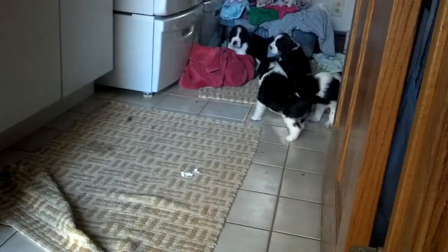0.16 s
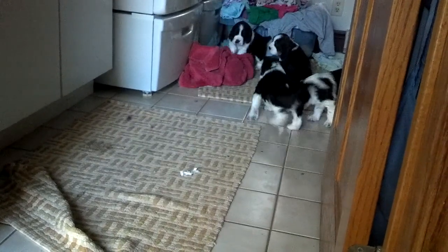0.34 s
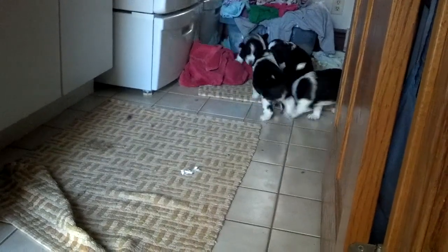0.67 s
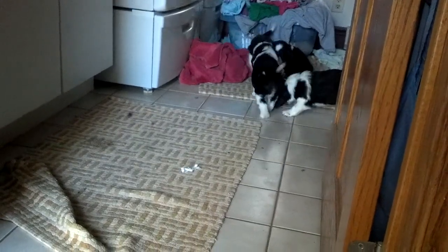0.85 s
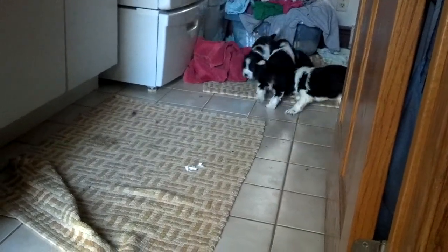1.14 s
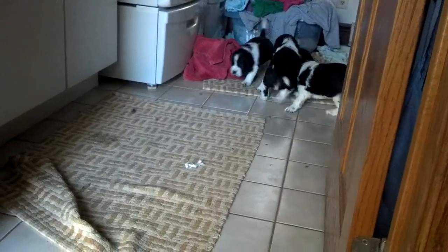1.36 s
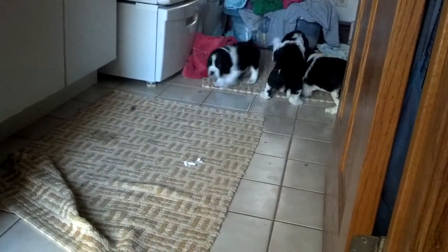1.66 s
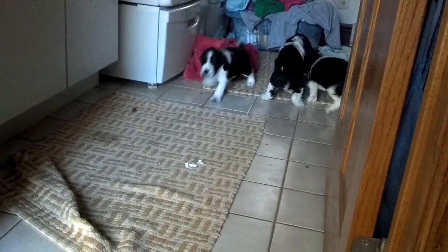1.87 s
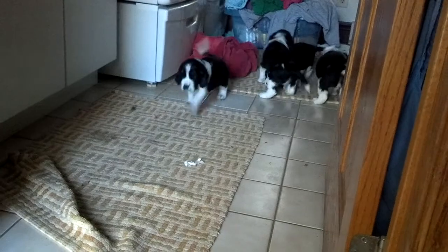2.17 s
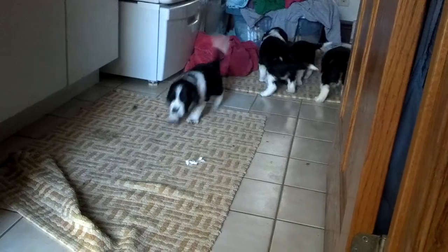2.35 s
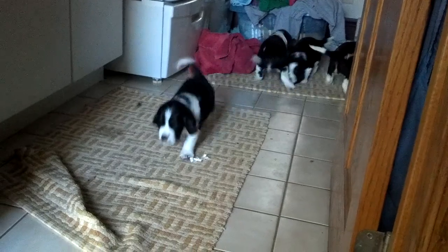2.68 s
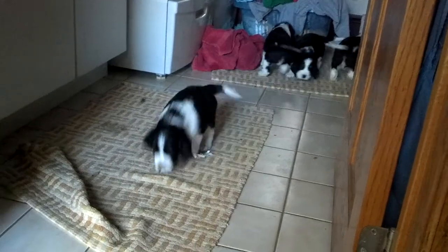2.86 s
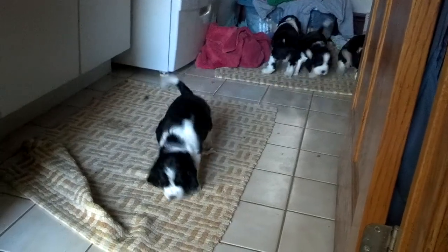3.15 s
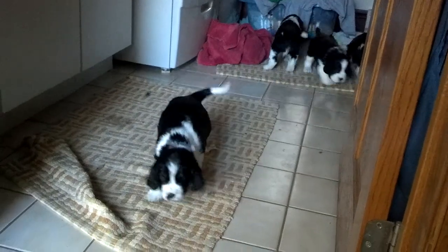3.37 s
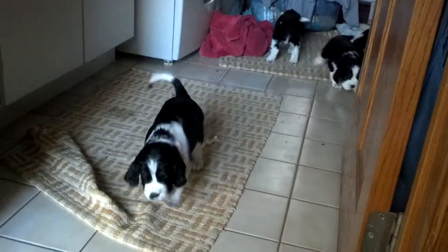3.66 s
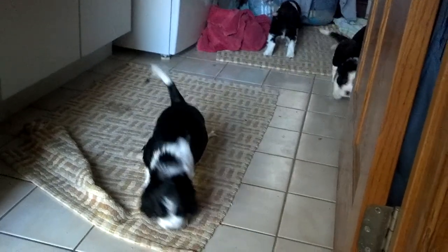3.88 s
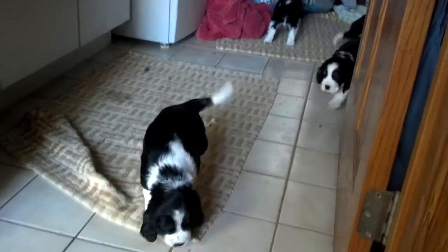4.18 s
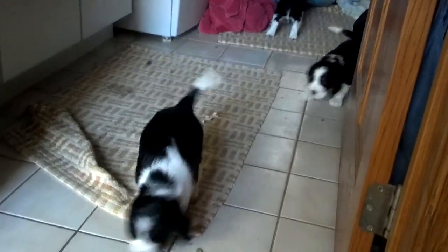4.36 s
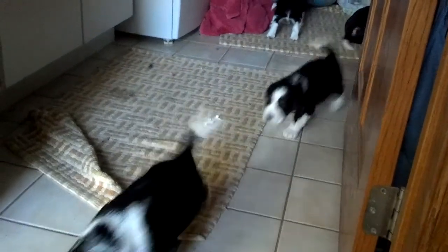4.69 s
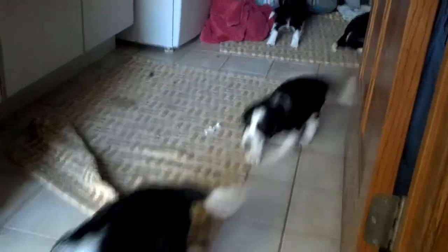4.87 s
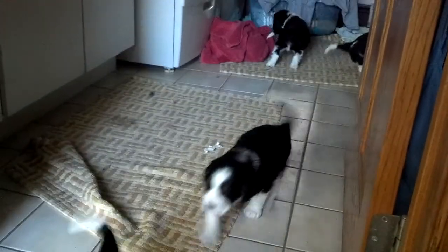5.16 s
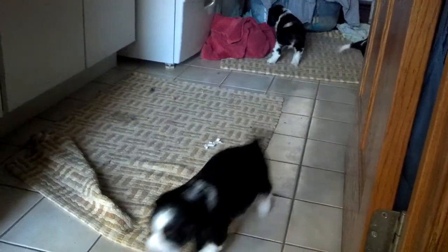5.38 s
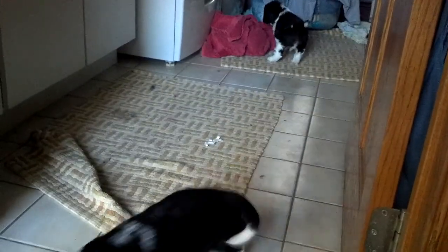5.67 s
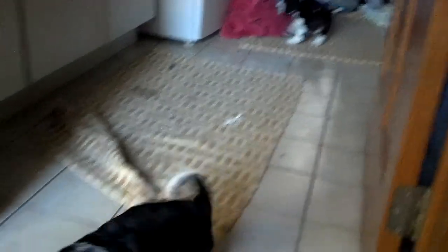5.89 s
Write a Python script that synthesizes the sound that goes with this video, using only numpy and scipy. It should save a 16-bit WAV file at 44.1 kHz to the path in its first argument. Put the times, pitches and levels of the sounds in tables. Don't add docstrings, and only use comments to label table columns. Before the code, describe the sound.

A small tiled room with a soft low appliance hum and short bright echoes, in wide stereo. From about 0.1 s puppies at a distance squeal: a sharp nasal whine around 0.1, a rising one near 0.5, then clusters of yips at 0.8 and 1.25, with a soft knock at 0.8. Calls are loudest and most frantic from 1.5 to 1.95 s, yelps with hoarse breath and very high thin whistles. Weaker yelps follow at 2.15, a thin whistle until 2.35, and a low yip at 2.6. From 2.9 to 4.4 s mostly hum, faint pad scuffs and light claw ticks. Crisp close clicks strike at 4.7 and 5.0. From 5.5 s a puppy scrambles by: hissing scrabble, a hard click at 5.6, scratch and squeak at 5.65, thuds, paired frame knocks at 5.75, another squeak at 5.88, and louder knocks after 5.9 as the hum dips.

```python
import sys
import numpy as np
from scipy import signal
from scipy.fft import rfft, irfft, next_fast_len
from scipy.io import wavfile

SR = 44100
rng = np.random.default_rng(int(sys.argv[2]) if len(sys.argv) > 2 else 0)


def wrap_up_sound(samples):
    columns = np.atleast_2d(samples).T
    tamed = np.clip(columns, -1, 1)
    steps = np.round(tamed * 32767).astype(np.int16)
    wavfile.write(sys.argv[1], SR, steps)


def elevation(decibels):
    levels = np.asarray(decibels, float)
    return 10 ** (levels / 20)


N = 265923
TOP_HZ = 15850


def at_hz(points, hz, column=1):
    points = np.array(points)
    return np.interp(np.log(hz + 1), np.log(points[:, 0] + 1), points[:, column])


def wobble(rate_hz):
    lowpass = signal.butter(2, rate_hz, fs=SR, output="sos")
    slow = signal.sosfilt(lowpass, rng.standard_normal(N))
    return slow / slow.std()


def ring(x, hz, width_hz):
    r = np.exp(-np.pi * width_hz / SR)
    poles = [1, -2 * r * np.cos(2 * np.pi * hz / SR), r * r]
    return signal.lfilter((1 - r * r) / 2 * np.array([1, 0, -1]), poles, x)


def band(x, low_hz, high_hz):
    y = signal.sosfilt(signal.butter(2, [low_hz, high_hz], "band", fs=SR, output="sos"), x)
    return y / y.std()


def swell(start, length, peak_share, rise_db, fade_db):
    end = start + length
    where = np.arange(round(start * SR), min(round(end * SR), N))
    times = [start, start + peak_share * length, end]
    progress = np.interp(where / SR, times, [0, peak_share, 1])
    level_db = np.interp(where / SR, times, [-rise_db, 0, -fade_db])
    ends = np.minimum(where - where[0], (where[-1] - where) / 2.04) / (0.0023 * SR)
    return where, progress, np.clip(ends, 0, 1) * elevation(level_db)


def glide(from_hz, to_hz, progress):
    return from_hz + (to_hz - from_hz) * np.minimum(progress / 0.7, 1)


def echoes():
    # [f/Hz, t/s]
    room_t60 = [(0, 0.24), (2000, 0.31), (6000, 0.33), (16000, 0.17)]
    t = np.arange(round(0.45 * SR)) / SR
    common, left, right = rng.standard_normal((3, len(t)))
    tail = 0
    for low_hz in 250 * 2.0 ** np.arange(6):
        alike = np.clip(0.9 - 0.28 * np.log2(low_hz / 250), 0, 1)
        noise = np.sqrt(alike) * common + np.sqrt(1 - alike) * np.array([left, right])
        decay = elevation(-60 * t / at_hz(room_t60, low_hz * 2.23))
        tail = tail + np.sqrt(low_hz) * band(noise, low_hz, 2 * low_hz) * decay
    tail = tail * np.clip(t / 0.003 - 0.3, 0, 1)
    return tail / np.sqrt(np.mean(np.sum(tail ** 2, axis=1)))


def placed(x, tail, wet_db, pan_db, lag):
    late = np.interp(np.arange(N) - lag, np.arange(N), x)
    direct = np.array([x * elevation(pan_db / 2), late * elevation(-pan_db / 2)])
    return direct + elevation(wet_db) * signal.fftconvolve(x[None], tail, axes=1)[:, :N]


def room_tone():
    # [f/Hz, common level/dB per Hz, unlike level/dB per Hz]
    air = [(30, -82, -100), (87, -74, -82), (122, -64, -77), (211.4, -62, -82.5), (350, -73.5, -84),
           (570, -76, -80.5), (933, -85.5, -94), (1500, -94.5, -90.5), (2340, -97.5, -99),
           (3400, -104, -103), (5530, -110, -109), (11800, -114, -114), (14500, -110, -111),
           (16000, -112, -118)]
    # [f/Hz, share 0-1]
    port_mismatch = [(30, .85), (130, 0.77), (250, 0), (600, 0.22)]
    # [f/Hz, level/dB]
    motor_lines = [(120, -48.5), (268.5, -58), (360, -53), (480, -57)]
    # [t/s, level/dB]
    gain_curve = [(0, -44), (2.7, -44), (4.8, -44.5), (5.59, -43.5), (5.78, -60), (5.96, -52), (6.03, -59)]
    size = next_fast_len(N)
    hz = np.arange(size // 2 + 1) * SR / size
    shape = np.array([elevation(at_hz(air, hz, column=c)) for c in (1, 2)]) * np.sqrt(SR / 2)
    white = rfft(rng.standard_normal((2, size)))
    share = np.clip(at_hz(port_mismatch, hz), 0, 1)
    white[1] = share * white[0] + np.sqrt(1 - share ** 2) * white[1]
    common, unlike = irfft(white * shape, size)[:, :N]
    for line_hz, level_db in motor_lines:
        phase = 2 * np.pi * line_hz * np.arange(N) / SR + 2 * np.pi * rng.random()
        common = common + elevation(level_db + 1.0 + 4.7 * wobble(1.1)) * np.sin(phase)
    s, level_db = np.transpose(gain_curve)
    gain = elevation(np.interp(np.arange(N) / SR, s, level_db) + 44)
    return np.array([common + unlike, common - unlike]) * gain


def scuffs():
    # [t/s, level/dB, centre f/Hz, length t/ms]
    soft_noises = [(0.001, -46.5, 3230, 12.5), (2.05, -34.5, 350, 30), (2.419, -47, 1130, 37),
                   (2.939, -45.5, 1480, 27), (0.345, -55, 4200, 36), (3.361, -48.5, 1600, 29),
                   (3.537, -46, 1290, 23), (3.661, -43, 1500, 6.5), (3.69, -47, 1050, 24),
                   (3.87, -46.5, 1200, 71), (4.07, -54, 3020, 22), (4.42, -49.5, 2970, 8.4),
                   (4.84, -52, 3500, 17), (5.079, -55.5, 5160, 150), (5.14, -48, 7800, 12.3),
                   (5.935, -30.5, 453, 23), (5.964, -40, 530, 20), (5.777, -39, 396, 34), (5.588, -31, 422, 7.1)]
    samples = 8000
    out, t = np.zeros(N + samples), np.arange(samples) / SR
    for s, level_db, hz, ms in soft_noises:
        noise = rng.standard_normal(samples)
        u = 3000 * t / ms
        grit = noise * np.abs(noise)
        slide = band(grit, hz / 4.6, hz * 1.24) + 1e-4 * hz * noise
        out[round(s * SR):][:samples] += elevation(level_db - 5.5) * slide * u * np.exp(1 - u)
    return out[:N]


def claws(table, width):
    samples = 1500
    out, t = np.zeros(N + samples), np.arange(samples) / SR
    bright = signal.butter(2, 2400, "high", fs=SR, output="sos")
    for s, peak_db, hz, ms, crack in table:
        first_touch = 2.5 * (t == 0)
        burst = (rng.standard_normal(samples) + first_touch) * np.exp(-1000 * t / ms)
        burst = crack * signal.sosfilt(bright, burst) + 2.6 * ring(burst, hz, width * hz)
        out[round(s * SR):][:samples] += elevation(peak_db - 6) * burst / np.abs(burst).max()
    return out[:N]


def scramble():
    # [start t/s, length t/s, scratch level/dB, hiss level/dB, thud level/dB]
    strokes = [
        (5.479, 0.053, -38, -27.5, -71),
        (5.529, 0.12, -40.5, -33.5, -30.5),
        (5.575, 0.044, -39.5, -29, -26.5),
        (5.601, 0.044, -36.5, -34, -51),
        (5.636, 0.095, -25, -67, -32),
        (5.728, 0.1, -44.5, -41, -27.5),
        (5.824, 0.06, -50, -53, -31.5),
        (5.878, .032, -38.5, -66, -69),
        (5.93, 0.021, -71, -53, -26),
        (5.95, 0.1, -74, -68, -41.5),
    ]
    # [f/Hz, width f/Hz, level/dB]
    scratch_rings = [(2880, 470, 19), (3690, 200, 15.5), (2360, 620, 11), (4400, 410, -38)]
    grains_per_s = 4000
    out = np.zeros(N)
    clumps = elevation(2.2 * np.clip(wobble(156), -3, 1.2))
    chance, sign = rng.random(N), rng.choice([-1, 1], N)
    size = elevation(1.3 * np.minimum(rng.exponential(1, N), 3.0))
    for s, length, scratch_db, hiss_db, thud_db in strokes:
        where, _, gain = swell(s, length, peak_share=0.28, rise_db=7.8, fade_db=18)
        struck = chance[where] < grains_per_s / SR
        grains = struck * sign[where] * size[where] * clumps[where]
        scratch = sum(elevation(level_db) * ring(grains, hz, width_hz) for hz, width_hz, level_db in scratch_rings)
        hiss = elevation(hiss_db - 17.5) * band(grains, 2700, TOP_HZ)
        thud = elevation(thud_db - 14.0) * band(grains, 720, 2360)
        out[where] += gain * (elevation(scratch_db - 5.5) * scratch / scratch.std() + hiss + thud)
    return out


def gasps(breath):
    # [start t/s, length t/s, peak level/dB]
    puffs = [
        (0.473, 0.14, -49.5),
        (0.613, .04, -51),
        (0.961, 0.081, -47),
        (1.298, 0.11, -46),
        (1.534, 0.11, -41),
        (1.62, 0.21, -50),
        (1.865, 0.078, -37.5),
    ]
    out = np.zeros(N)
    for s, length, level_db in puffs:
        where, _, gain = swell(s, length, peak_share=0.28, rise_db=10, fade_db=14)
        out[where] += gain * elevation(level_db - 12.0) * breath[where]
    return out


def whistles(folds, jitter, breath):
    # [start t/s, length t/s, from f/Hz, to f/Hz, peak level/dB]
    thin = [
        (.112, 0.13, 7380, 7100, -42),
        (.466, 0.086, 7540, 7320, -44.5),
        (.855, 0.045, 7800, 7450, -46),
        (1.24, 0.11, 9060, 8760, -48.5),
        (1.508, 0.036, 7420, 7260, -37),
        (1.565, 0.073, 7250, 7150, -40.5),
        (1.86, 0.092, 7000, 7460, -40.5),
        (2.25, 0.099, 7220, 7320, -44.5),
    ]
    full = [(0, 0.025, 6970, 6540, -52.5), (.167, 0.065, 6730, 6660, -38), (.227, 0.073, 6440, 6510, -47.5),
            (.523, 0.085, 6520, 6830, -42.5), (.596, 0.039, 6440, 6410, -41.5),
            (.874, 0.085, 6650, 6480, -47.5), (.92, 0.049, 6920, 6590, -43.5),
            (1.278, 0.08, 7500, 6980, -42.5), (1.34, 0.045, 6580, 6450, -39),
            (1.62, 0.062, 6670, 6350, -33), (1.943, 0.031, 6450, 6480, -35),
            (2.19, 0.118, 6860, 6960, -42.5)]
    out, flutter = np.zeros(N), wobble(180)
    # (octave/dB, share before the peak, rise/dB, fade/dB)
    for notes, (octave_db, *shape) in ((thin, (-7, 0.3, 10, 10)), (full, (5.7, 0.11, 3.6, 6.3))):
        for s, length, from_hz, to_hz, level_db in notes:
            where, progress, gain = swell(s, length, *shape)
            hz = glide(from_hz, to_hz, progress) * (1 + 0.009 * flutter[where])
            phase = 2 * np.pi * np.cumsum(hz) / SR
            tone = elevation(-5) * np.sin(phase) + elevation(octave_db - 10.0) * np.sin(2 * phase)
            rasp = 1 + 0.14 * folds[where] + 0.48 * jitter[where]
            out[where] += gain * elevation(level_db) * (tone * rasp + elevation(-32.5) * breath[where])
    return out


def squeals(jitter, breath):
    # [f/Hz, level/dB]
    throat = [(500, 3.5), (1400, 1.5), (2000, -5.5), (2700, -7), (3300, -0.5), (4500, 1.5), (5600, -18.5),
              (9000, -2), (15000, -63)]
    # [start t/s, length t/s, from f/Hz, to f/Hz, peak level/dB]
    whines = [
        (.12, 0.035, 1367, 1344, -16.5),
        (.18, 0.029, 1389, 1343, -36.5),
        (.474, 0.076, 1564, 1682, -30.5),
        (1.615, 0.058, 1155, 1306, -23),
        (1.86, 0.027, 1163, 1166, -18.5),
        (1.922, 0.024, 1127, 1077, -21.5),
        (1.572, 0.046, 1440, 1444, -17),
    ]
    yips = [
        (.578, 0.069, 1138, 1096, -33.5),
        (.822, 0.068, 1204, 1143, -32),
        (.856, 0.062, 1165, 1113, -29.5),
        (1.224, 0.05, 1412, 1500, -30.5),
        (1.262, 0.081, 1530, 1540, -40),
        (1.322, 0.055, 1273, 1170, -33.5),
        (1.895, 0.045, 1161, 1104, -23.5),
        (2.57, 0.065, 582, 600, -34.5),
    ]
    yelps = [
        (1.514, 0.089, 1508, 1517, -29.5),
        (1.522, 0.059, 1674, 1670, -27.5),
        (1.585, 0.042, 1460, 1326, -23),
        (1.81, 0.076, 886.4, 1185, -26),
        (1.93, 0.051, 868, 942, -31.5),
        (2.14, 0.046, 670, 809, -30.5),
        (2.175, 0.045, 787, 880, -32),
    ]
    # (fall/dB per octave, roughness 0-1, share before the peak, rise/dB, fade/dB)
    voice_sets = ((whines, (20, 0.15, 0.54, 7.8, 4)),
                  (yips, (12.1, 0.389, 0.37, 6.4, 8)),
                  (yelps, (6.5, 0.234, 0.57, 6.5, 6)))
    out, folds = np.zeros(N), np.zeros(N)
    shimmer = wobble(124)
    k = np.arange(1, 11)[:, None]
    for calls, (fall_db, rough, *shape) in voice_sets:
        for s, length, from_hz, to_hz, level_db in calls:
            where, progress, gain = swell(s, length, *shape)
            hz = glide(from_hz, to_hz, progress)
            phase = 2 * np.pi * np.cumsum(hz * (1 + 0.087 * rough * jitter[where])) / SR
            strength = elevation(at_hz(throat, k * hz) - fall_db * np.log2(k)) * (k * hz < 0.4 * SR)
            uneven = 1 + rough * np.sqrt(k) * 0.61 * shimmer[where]
            tone = np.sum(uneven * strength * np.sin(k * phase), axis=0)
            out[where] += gain * elevation(level_db - 9) * tone
            out[where] += gain * elevation(level_db - 26 - 0.2 * fall_db) * rough * breath[where]
            folds[where] = np.sin(phase)
    return out, folds


def voices():
    jitter = wobble(110)
    breath = band(rng.standard_normal(N), 4300, 18000)
    calls, folds = squeals(jitter, breath)
    return calls + whistles(folds, jitter, breath) + gasps(breath)


def scene():
    # [t/s, peak level/dB, ring f/Hz, decay t/ms, share of broad crack 0-1]
    tile_claws = [(2.0452, -35, 4030, 2.2, 0.1), (2.4117, -41.5, 3530, 4, 0.3),
                  (4.2752, -47, 4030, 1.2, 0.6), (4.4138, -41.5, 3770, 1.4, 1), (4.6946, -17, 6000, 1.1, 1),
                  (4.6975, -24, 3600, 1.6, 0.4), (4.8194, -41, 4770, 3, 1), (4.9745, -14, 3700, 0.43, 0.3),
                  (5.4824, -25, 3900, 0.83, 0.6), (5.4968, -30, 6870, 1.2, 0.5), (5.755, -31, 3400, 1.2, 1),
                  (5.8324, -49, 4100, 1.2, 0.6)]
    frame_knocks = [
        (.782, -36, 730, 1.1, .05),
        (5.742, -27, 1150, 1.1, .05),
        (5.769, -22, 1350, 1.5, .05),
        (5.9198, -16, 1250, .8, .02),
        (5.929, -17, 1100, 1.0, .1),
        (5.966, -23, 1150, 1.0, .01),
    ]
    pad_squeaks = [
        (5.8415, -27, 2450, 3.5, 0),
        (5.884, -21, 2780, 6, 0),
        (5.662, -15, 2780, 8, 0),
    ]
    under_claws = [
        (5.5988, -3, 4000, .3, .3),
        (5.6125, -13, 4000, 1.2, .9),
    ]
    tail = echoes()
    early = tail * elevation(-130 * np.arange(tail.shape[1]) / SR)
    far = placed(voices() + scuffs(), tail, wet_db=-0.5, pan_db=11.0, lag=4.75)
    taps = placed(claws(tile_claws, width=0.35), early, wet_db=3.0, pan_db=-18.0, lag=6.3)
    knocks = ring(claws(frame_knocks, width=0.3), 1200, 2500)
    close = placed(knocks + claws(pad_squeaks, width=0.03), early, wet_db=-7, pan_db=-1.5, lag=7.0)
    under = placed(claws(under_claws, width=0.5), early, wet_db=-10, pan_db=-1.5, lag=1.0)
    passing = placed(scramble(), early, wet_db=1, pan_db=-13.5, lag=10.3)
    return room_tone() + far + taps + close + under + passing


def low_pass(x):
    return signal.sosfilt(signal.butter(12, 16810, fs=SR, output="sos"), x)


def record(dry):
    lag = 16
    late = np.pad(dry, ((0, 0), (lag, 0)))[::-1, :N]
    top_cut = signal.cheby2(14, 45, TOP_HZ, fs=SR, output="sos")
    mix = signal.sosfilt(top_cut, dry - 0.95 * late)
    return low_pass(mix)


dry = scene()
out = record(dry)
wrap_up_sound(out)
```